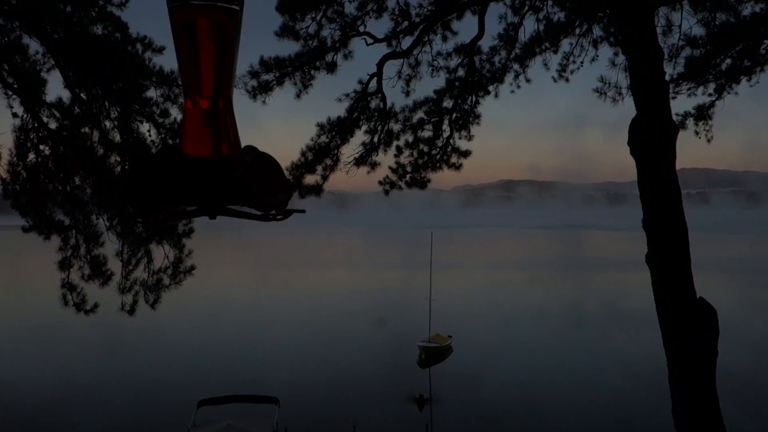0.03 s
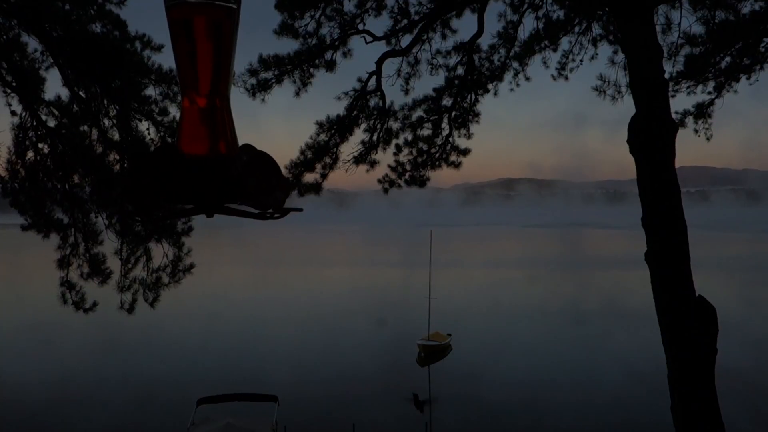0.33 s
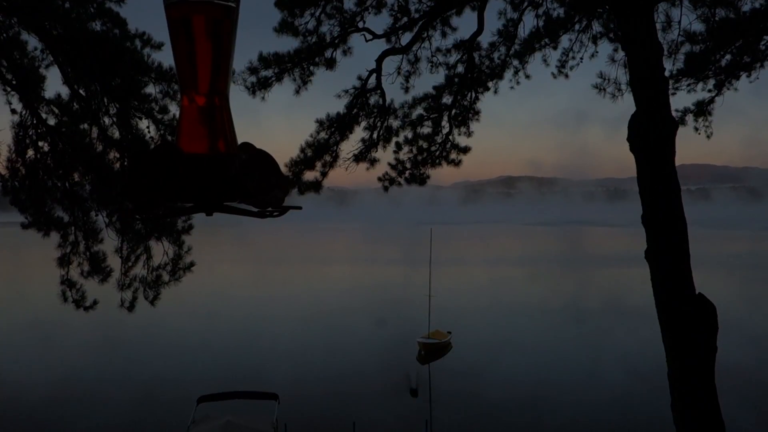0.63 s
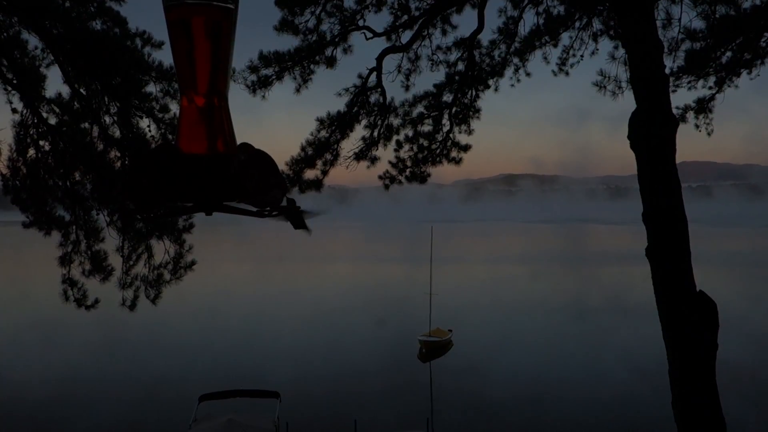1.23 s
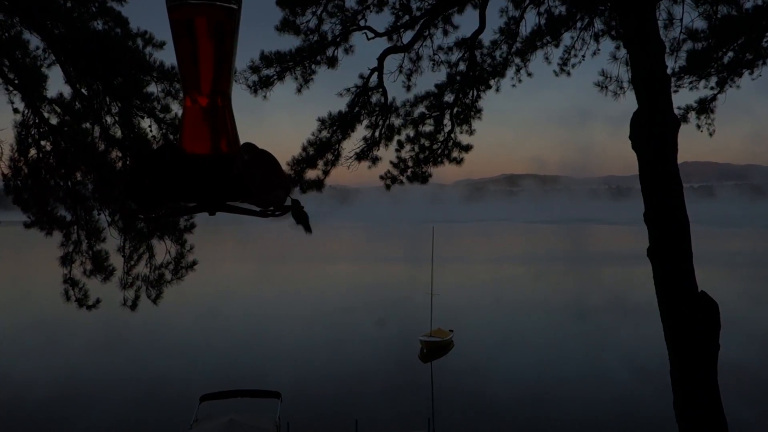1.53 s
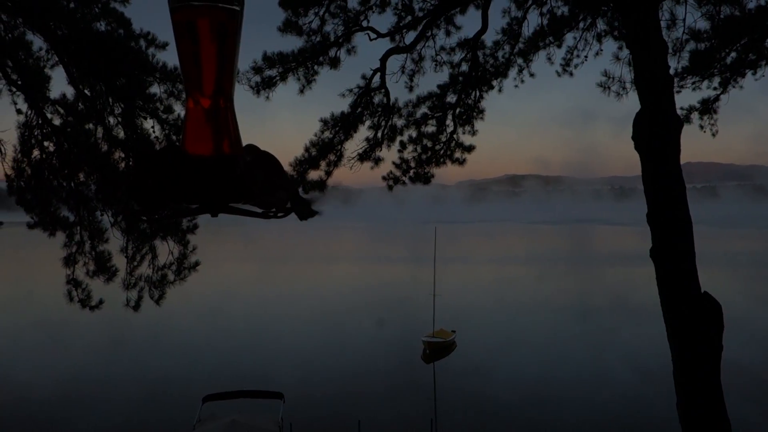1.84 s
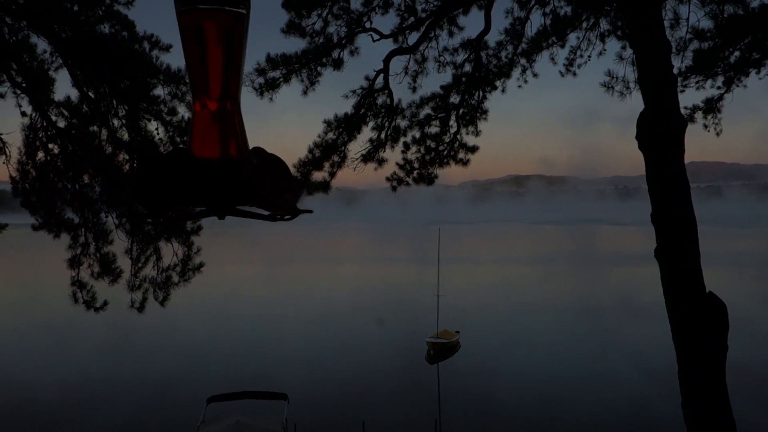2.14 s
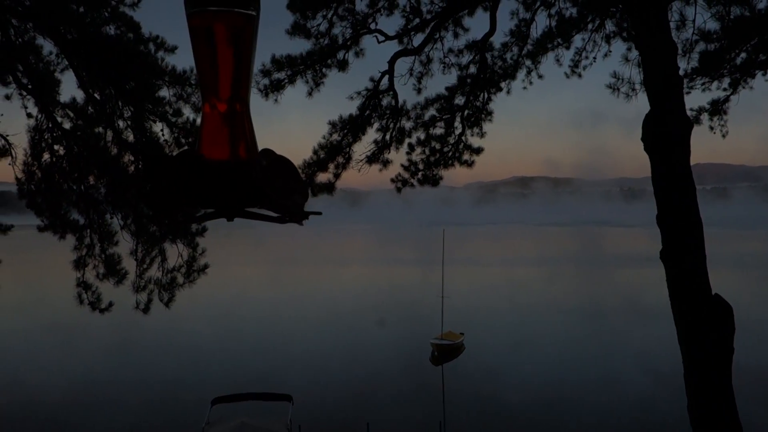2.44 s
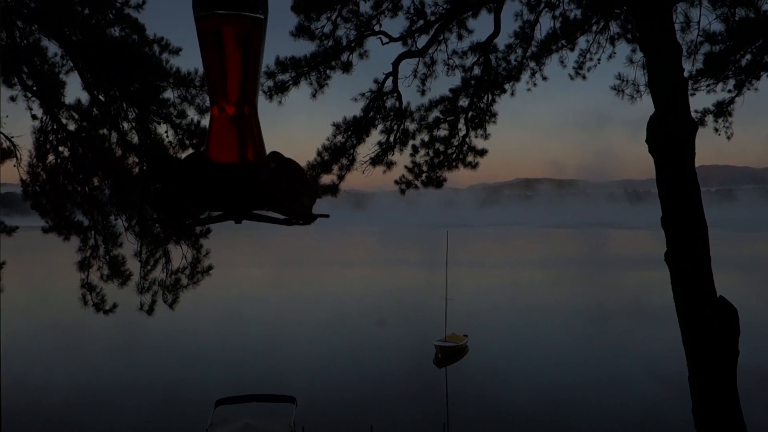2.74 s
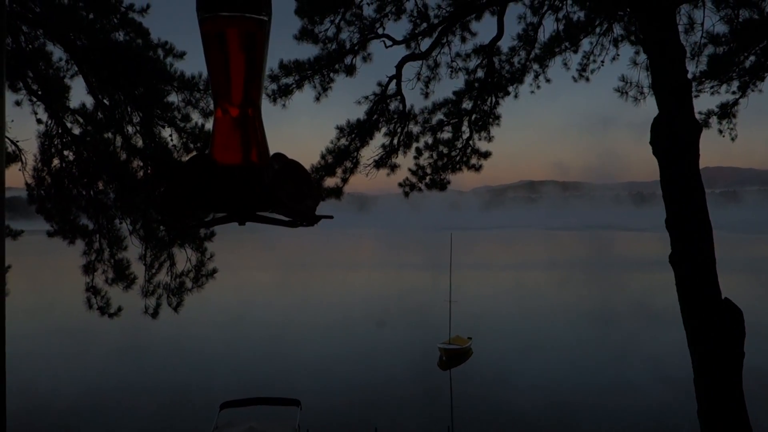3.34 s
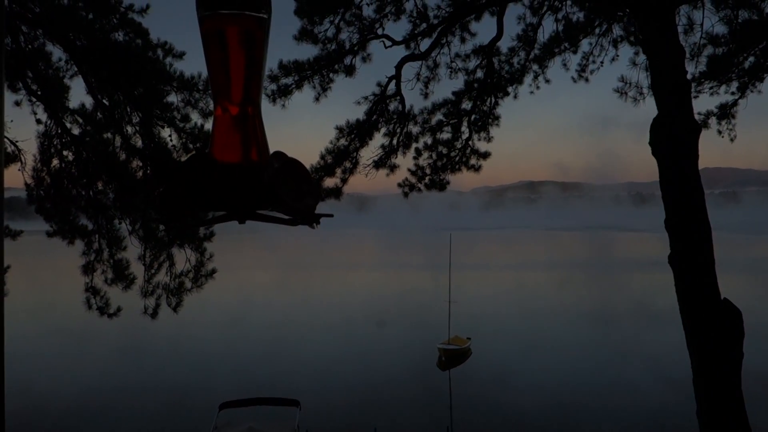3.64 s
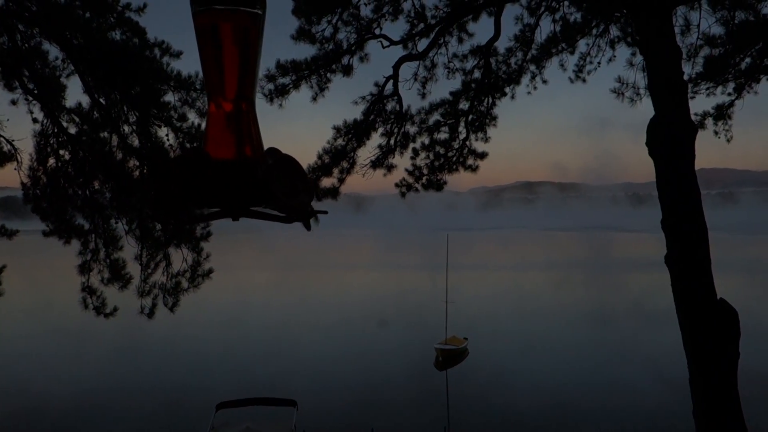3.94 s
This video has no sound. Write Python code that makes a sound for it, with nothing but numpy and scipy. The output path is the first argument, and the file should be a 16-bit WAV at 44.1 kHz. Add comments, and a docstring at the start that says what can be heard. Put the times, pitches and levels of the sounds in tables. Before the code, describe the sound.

The soft whir of a hummingbird comes close to the microphone, pulses harder a few times with slight feather trills, then eases away. Behind it are a far wavering motor, lakeside rumble and hiss, and faint echoing bird calls.

```python
"""A hummingbird's wings flutter softly at a hanging feeder, by a still lake at dawn. Each wingbeat
pushes the air: the beats thump as the bird brakes and turns, and the feathers sometimes trill or rustle.
Far birds whistle and echo through the trees. Under it all lie the wavering hum of a far motor,
a distant low rumble and a fine hiss. The sound fades in at the start."""
import sys
import numpy as np
from scipy import signal
from scipy.fft import rfft, irfft
from scipy.io import wavfile

SR = 44100
rng = np.random.default_rng(int(sys.argv[2]) if len(sys.argv) > 2 else 0)


def transcribe(u):
    """Save the signal u as a 16-bit wav file named by the first command-line argument.

    u: samples, shape (n,) or (channels, n), limited to [-1, 1]; the rate is SR.
    q: integer samples, one column per channel.
    """
    v = np.clip(np.atleast_2d(u).T, -1, 1)
    q = np.round(v * 32767).astype(np.int16)
    wavfile.write(sys.argv[1], SR, q)


N = 176400  # 4 seconds


def undb(db):
    """Turn decibels (dB) into a number to multiply by."""
    return 10 ** (np.asarray(db) / 20)


def unit(x):
    """Scale a signal to an average power of 1."""
    return x / np.sqrt(np.mean(x ** 2) + 1e-30)


def clock():
    """Time of every sample in seconds."""
    return np.arange(N) / SR


def curve(rows):
    """A changing volume, drawn through points of seconds and dB."""
    return undb(np.interp(clock(), *np.array(rows).T))


def colour(x, rows):
    """Make some pitches louder and others softer, following points of Hz and dB."""
    hz, db = np.array(rows).T
    f = np.maximum(np.fft.rfftfreq(N, 1 / SR), 1)
    return irfft(rfft(x) * undb(np.interp(np.log(f), np.log(hz), db)), N)


def noise(rows):
    """Noise of power 1, shaped by points of Hz and dB."""
    return unit(colour(rng.standard_normal(N), rows))


def walk(rate):
    """A smooth random wobble of size about 1, with about `rate` changes a second."""
    f = np.fft.rfftfreq(N, 1 / SR)
    return unit(irfft(rfft(rng.standard_normal(N)) * np.exp(-(f / rate) ** 2) * (f > 0), N))


def pan(left_db):
    """Left and right volumes, with the left `left_db` above the right."""
    return undb(np.array([[left_db], [-left_db]]) / 2)


def arch(start, length):
    """A volume that rises and falls in a rounded arch."""
    u = np.clip((clock() - start) / length, 0, 1)
    return 2 * np.sqrt(u * (1 - u))


def hummingbird():
    """Each wingbeat gives a thump and a puff of air; the feather sounds pulse in step with it."""
    # Louder as the bird comes close. Each row: time in seconds, gain in dB.
    nearness = [(0, -13), (.5, -13), (.77, 1), (.9, -13), (1.1, -2), (1.3, -2), (1.6, -3.5), (2.05, 1),
                (2.3, -8.5), (2.6, -9), (4, -17.5)]
    # Bursts of hard wing work. Each row: middle in seconds, half length in seconds, boost in dB.
    turns = [(1.072, .065, 9.5), (1.598, 0.037, 10), (1.76, 0.049, 10), (2.063, .035, 5.5)]
    # The low wash of air stirred by the wings. Each row: frequency in Hz, relative level in dB.
    wash_shape = [(30, -14), (72, -3), (100, -0.5), (130, -2), (180, 1), (280, -9.5), (430, -4),
                  (650, -19.5), (1000, -29), (2000, -50)]
    # The high swish of that air. Each row: frequency in Hz, relative level in dB.
    swish_shape = [(500, -8), (1300, 1), (3000, 0.5), (8000, 0.5), (15000, -7.5)]
    wing_hz, thump_s, stroke_beats = 48.81, .0011, .25
    backstroke = .29  # strength as a share of the downstroke
    beats = .336 + np.cumsum(wing_hz * (1 + .0017 * walk(5.1))) / SR
    turn_db = sum(db * np.exp(-((clock() - at) / half) ** 2) for at, half, db in turns)
    strength = curve(nearness) * undb(turn_db + .9 * walk(30))  # no two strokes are quite alike
    down, up = (beats + .5) % 1 - .5, beats % 1 - .5  # time from each stroke's middle, in beats
    thump = air_push(down / wing_hz / thump_s) - backstroke * air_push(up / wing_hz / thump_s)
    flutter = unit(np.exp(-(down / stroke_beats) ** 2) + backstroke * np.exp(-(up / stroke_beats) ** 2))
    wash = undb(-55.5) * noise(wash_shape)
    swish = undb(-74) * np.array([noise(swish_shape), noise(swish_shape)])
    wings = undb(-49.5) * thump + flutter * wash + np.sqrt(flutter) * swish
    return strength * wings + flutter * (feather_rustle() + feather_trill())


def air_push(offset):
    """One wing stroke swings the air pressure down, then up; `offset` is time in pulse widths."""
    return offset * np.exp(.5 - offset ** 2 / 2)


def feather_rustle():
    """Feathers give a short papery rustle as the bird brakes."""
    # The tone of the rustle. Each row: frequency in Hz, relative level in dB.
    rustle_shape = [(700, 3), (1300, -4), (2900, 2), (4500, -6.5), (12000, -11)]
    return undb(-68.5) * arch(start=1.03, length=.094) * noise(rustle_shape)


def feather_trill():
    """Feathers sing a high, unsteady note now and then."""
    # Each row: start in seconds, length in seconds, pitch in Hz, level in dB before the wings pulse it.
    trills = [(.12, 0.45, 4050, -77), (1.88, 0.2, 4230, -71.5), (2.57, 0.094, 4000, -77)]
    wobble_hz, trill = 150, 0
    for start, length, hz, db in trills:
        cycles = np.cumsum(hz + wobble_hz * walk(235)) / SR
        trill = trill + undb(db) * arch(start, length) * np.sin(2 * np.pi * cycles)
    return trill


def far_birds():
    """Thin gliding whistles and hoarse calls, smeared by the echo of the trees."""
    # Bird calls. Each row: start in seconds, length in seconds, first and last pitch in Hz,
    # level in dB before the echo, roughness (0 is pure, about 1 is hoarse).
    calls = [(0.514, 0.25, 5310, 5400, -77, .35), (0.867, .13, 3620, 3550, -73, 0.38),
             (1.003, 0.11, 3530, 3500, -74.5, .45), (1.029, .24, 3295, 3180, -74.5, 0.43),
             (2.246, 0.014, 3520, 3340, -69, 0.49), (3.239, .4, 2165, 2083, -78, 1.01),
             (3.657, 0.32, 2090, 2200, -79, 1)]
    rough_hz, echo_s = 129.6, .9  # the echo drops 60 dB in echo_s
    t, direct = clock(), 0
    for start, length, first_hz, last_hz, db, rough in calls:
        glide = np.interp(t, [start, start + length], [first_hz, last_hz])
        hz = glide + rough * rough_hz * walk(174)
        direct = direct + undb(db) * arch(start, length) * np.sin(2 * np.pi * np.cumsum(hz) / SR)
    tail = rng.standard_normal((2, N)) * np.exp(-np.log(1000) * t / echo_s)
    echo = signal.fftconvolve(direct[None], unit(tail) / np.sqrt(N), axes=1)[:, :N]
    return (direct + undb(-.5) * echo) * pan(left_db=1)


def motor():
    """A far hum whose tones waver on their way across the water; its upper whine slowly grows."""
    # The motor's tones: the main hum first, then the others from low to high.
    # Each row: pitch in Hz, base level in dB.
    tones = [(220.2, -51), (58.17, -67), (118.7, -65.5), (279.3, -71), (585.5, -76), (656.4, -75.5),
             (688, -80)]
    # Swells and dips of the main hum. Each row: time in seconds, gain in dB.
    swells = [(.25, -2), (1.2, -6), (1.45, 0.5), (1.9, -1), (2.22, 3.5), (2.6, -4), (2.78, 2), (3.15, -6),
              (3.6, -2.5), (3.85, 1)]
    waver_db, whine_db_per_s, whine_above_hz = .95, 1.6, 500
    hum = 0
    for k, (hz, db) in enumerate(tones):
        cycles = np.cumsum(hz * (1 + .0015 * walk(3.27))) / SR + rng.random()
        growth_db = whine_db_per_s * (clock() - N / SR / 2) * (hz > whine_above_hz)
        tone = np.sqrt(2) * np.sin(2 * np.pi * cycles) * undb(db + growth_db + waver_db * walk(2.7))
        hum = hum + tone * (curve(swells) if k == 0 else 1)
    return hum


def air():
    """A distant rumble with its bass in the middle, and a wide hiss that flickers slightly."""
    # The tone of the rumble. Each row: frequency in Hz, relative level in dB.
    rumble_shape = [(15, -28), (35, -16), (58, -6.5), (78, -15.5), (98, -1.5), (125, -5.5), (160, -3),
                    (195, 1.5), (250, -5.5), (310, -7), (370, -14), (480, -15), (680, -16.5), (780, -23),
                    (870, -23), (980, -33.5), (1500, -45)]
    # How wide the rumble is. Each row: frequency in Hz, level of the sides against the middle in dB.
    rumble_width = [(60, -43), (200, -31), (380, -9.5), (700, -8.5), (1000, -5), (1500, 3)]
    # The tone of the hiss. Each row: frequency in Hz, relative level in dB.
    hiss_shape = [(300, -16.5), (800, 2.5), (1050, 2.5), (1250, 6), (1650, 1.5), (2000, 3), (2500, -2),
                  (3000, -2.5), (3900, 0.5), (4700, -0.2), (5200, 0.2), (6000, -2), (11000, -5),
                  (15500, -12)]
    sides = colour(noise(rumble_shape), rumble_width) * np.array([[1], [-1]])
    rumble = (noise(rumble_shape) + sides) * undb(-52 + .38 * walk(2.6))
    hiss = np.array([noise(hiss_shape), noise(hiss_shape)]) * undb(-66.5 + .55 * walk(8))
    return rumble + hiss * pan(left_db=-1.6)


def scene():
    """Add all the sounds together, in stereo."""
    return air() + motor() + hummingbird() + far_birds()


def record(dry):
    """Fade the sound in and cut off the very highest treble."""
    # The fade-in. Each row: time in seconds, gain in dB.
    fade = [(.042, -67), (.054, -16), (.1, -4), (.17, -1), (.3, 0.5)]
    top_hz = 15700
    treble_cut = signal.ellip(12, .1, 80, top_hz, fs=SR, output="sos")
    return signal.sosfilt(treble_cut, dry * curve(fade))


dry = scene()
out = record(dry)
transcribe(out)
```